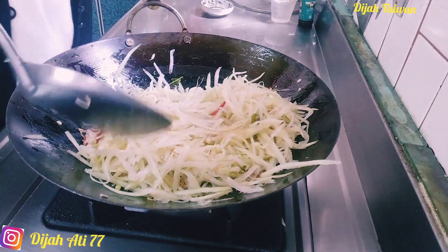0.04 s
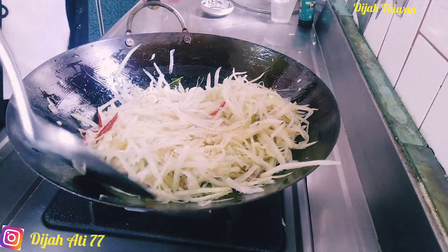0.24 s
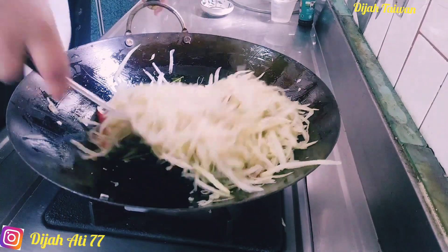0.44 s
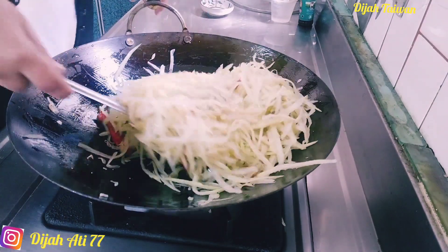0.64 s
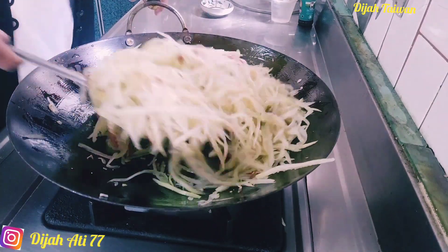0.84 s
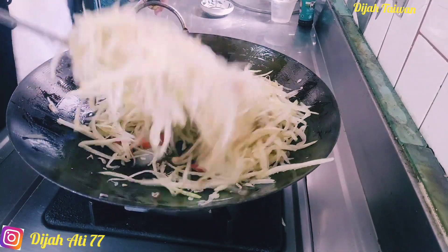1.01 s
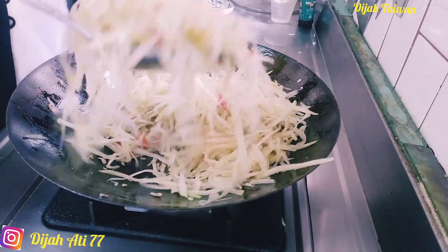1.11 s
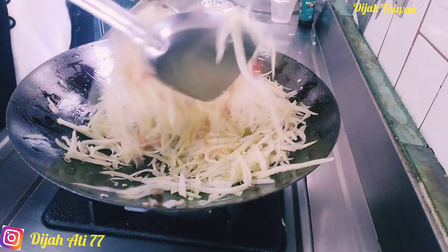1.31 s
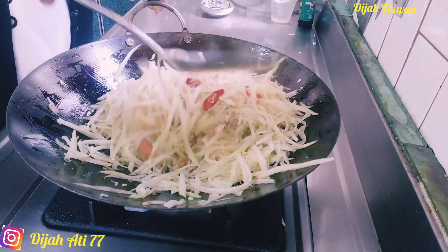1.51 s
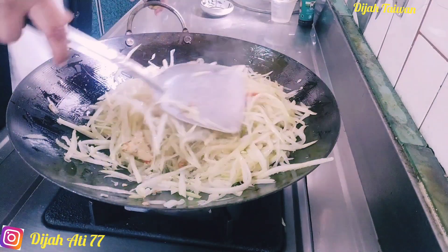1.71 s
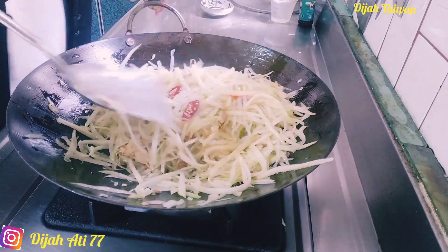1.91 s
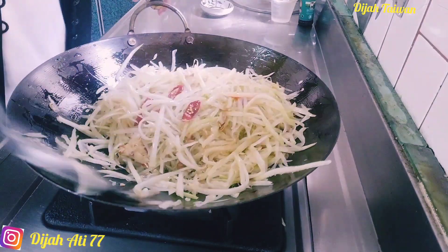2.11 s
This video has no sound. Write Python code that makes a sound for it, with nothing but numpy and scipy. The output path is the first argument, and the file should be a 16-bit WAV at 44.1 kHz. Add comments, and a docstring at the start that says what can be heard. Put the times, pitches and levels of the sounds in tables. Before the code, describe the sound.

Close, mono kitchen sound of stir-frying: moderate sizzle, a bright ringing spatula hit, quick heavy clanks with a rough scrape and wok knocks, a quieter lull, then crackling sizzle swelling twice as food lands on hot metal.

```python
"""Stir-frying in a steel wok

Shredded vegetable sizzles in oil, swelling whenever it is turned onto hot metal: random clicks, filtered.
A metal spatula clanks on the wok, chatters and scrapes under the heap: decaying modes and rough slips.
Oil spits in single short pops, and the wok rumbles on its stand over low burner and kitchen air."""
import sys
import numpy as np
from scipy import signal
from scipy.io import wavfile
from scipy.ndimage import uniform_filter1d

SR = 44100
rng = np.random.default_rng(int(sys.argv[2]) if len(sys.argv) > 2 else 0)


def transcribe(signal):
    """Save signal, clipped to [-1, 1], as a 16-bit WAV file at the path in sys.argv[1]."""
    frames = np.atleast_2d(signal).T
    limited = np.clip(frames, -1, 1)
    pcm = np.round(limited * 32767).astype(np.int16)
    wavfile.write(sys.argv[1], SR, pcm)


N = 94815
T = np.arange(N) / SR  # seconds

# Burner and kitchen air. Each row: frequency in Hz, relative density in dB per Hz.
AIR_SPECTRUM = [(15, -67), (25, -24), (54, -21), (91, -36), (118, -16), (176, -21.5), (283, -16.5),
                (508, -30), (592, -12.5), (700, -6.5), (910, -45), (1540, -120)]
AIR_DB = -63

# Knocking of the wok as it shifts on its stand. Each row: time in seconds, level in dB.
KNOCK_LEVEL = [(0.0, -31.5), (0.034, -41.5), (0.138, -57), (0.216, -62), (0.248, -39.5), (0.268, -39),
               (0.358, -54.5), (0.382, -37.5), (0.44, -43.5), (0.476, -60), (0.518, -43), (0.728, -80),
               (0.748, -78), (0.8, -78)]
# Spectrum of that knocking. Each row: frequency in Hz, relative density in dB per Hz.
KNOCK_SPECTRUM = [(24, -28), (40, -37), (166, -5.5), (334, -10.5), (595, -7.5), (869, -15), (1060, -14),
                  (1140, -28), (1500, -19), (1950, -82), (3300, -120)]
# Deepest part of the rocking. Each row: time in seconds, level in dB.
THUD_LEVEL = [(0.2, -70), (0.268, -72), (0.374, -52), (0.394, -57), (0.468, -55), (0.662, -54.5),
              (0.7, -69), (0.802, -62.5), (0.85, -81)]
THUD_HZ, THUD_WIDTH_HZ = 113.4, 78

# Spatula edge scraping the steel. Each row: time in seconds, level in dB.
SCRAPE_LEVEL = [(.34, -62), (.385, -53), (.40, -38.5), (.43, -35.5), (.47, -34), (.52, -36.5), (.56, -43),
                (.60, -64), (.64, -91)]
# Spectrum of the slips. Each row: frequency in Hz, relative density in dB per Hz.
SLIP_SPECTRUM = [(300, -11.5), (600, -10), (1050, -16), (1900, -10), (3000, -3), (4000, -1.5),
                 (5800, -11.5), (8000, -30), (12000, -24), (20000, -68)]
SLIPS_PER_S, SLIP_SPREAD_DB = 2000, 2.6
SCRAPE_RING_DB, SCRAPE_WIDTH_HZ = -3, 2.87 / 0.15  # ring against hiss; bandwidth of each damped mode

# Modes of wok and spatula. Each entry: frequency in Hz.
MODE_HZ = [178, 205, 258, 540, 592, 915, 1060, 1261, 1357, 1450, 1672, 1835, 1906, 2452, 2995, 3078, 3890,
           3940, 4085, 4570, 5090, 5485, 5770, 6130, 6900, 8100, 9900, 11800]
# The same modes in order. Each row: relative level in dB, free 60 dB decay time in seconds.
MODE_RINGING = [(-38, 0.24), (-16.5, 0.61), (-6, 0.29), (-29, .2), (-30, 0.23), (-11, 0.42), (2, 0.66),
                (-17.5, 1), (-18, 0.32), (-16, 0.081), (-7.5, 0.21), (-1, 0.062), (-7.5, .1), (-12.5, 0.13),
                (-6.5, 0.18), (-9, 0.21), (-9.5, 0.25), (-2.5, 0.14), (-16, 0.25), (-9, 0.11), (-18, 0.11),
                (-15, .1), (-15, 0.14), (-18, 0.11), (-7.5, 0.059), (-7, 0.048), (-15.5, 0.078), (-23, .06)]
# Blows, the first square on. Each row: start in seconds, level in dB, frequency rung best in Hz,
# share of the free decay time, rise time constant in seconds.
BLOWS = [(0.2391, -13.5, 1510, 0.81, 0.00085), (.355, -22, 2940, 0.68, 0.0063),
         (.376, -17.5, 203, 0.37, 0.0012), (0.375, -1.5, 1470, 0.52, .004),
         (0.391, -19, 3960, 0.65, 0.0046), (.405, -1.5, 560, 0.39, 0.0032), (.432, -1.5, 580, 0.56, 0.0024),
         (.443, -14.5, 3870, 0.46, 0.0043), (.459, -11, 1640, .5, 0.0071),
         (0.509, -34.5, 1060, 0.32, 0.0013), (.511, -16.5, 1370, 0.44, 0.00083),
         (.54, -17.5, 4085, .5, 0.0056), (1.158, -11.5, 4085, 0.39, 0.0054), (1.5, -30.5, 1060, 0.12, .004),
         (1.82, -14.5, 3160, 0.8, 0.0028), (1.854, -14.5, 4540, 0.96, 0.007),
         (1.878, -29.5, 1060, 0.17, 0.0038), (2.03, -35.5, 1060, 0.17, 0.0035)]
# Distance in octaves at which a mode is rung 6 dB less; dull blows are those aimed below DULL_BELOW_HZ.
SQUARE_OCT, GLANCING_OCT, DULL_OCT, DULL_BELOW_HZ = 4.0, 0.07, 0.3, 700
SLOW_RISE_S, SLOW_BELOW_HZ = 0.024, 1220  # after the square blow the low modes swell in slowly
PRESS_S, PRESS_DB_PER_S = 0.43, 80  # the spatula pressing under the food damps the blows' ringing

# Noise crack of the square blow. Each row: frequency in Hz, relative density in dB per Hz.
CRACK_SPECTRUM = [(500, -22), (1800, 0.5), (4000, -3.5), (8000, -7), (15700, -22)]
CRACK_DB, CRACK_RISE_S, CRACK_T60_S = -21, 0.00104, 0.08

# Loud single pops of oil. Each row: centre in seconds, envelope peak in dB, frequency in Hz.
SPITS = [(.819, -33, 4000), (.963, -30, 4000), (1.8198, -12, 2800), (1.9425, -22, 3000)]

# Course of the sizzle. Each row: time in seconds, level in dB, treble gain in dB, low-mid gain in dB.
SIZZLE = [(0, -38.5, -8, 8.5), (.11, -39.5, -10, -1), (.23, -39, -8.5, 4), (.36, -36, -10, 15.5),
          (.5, -38, -1, 8), (.6, -42, 0, 7), (.7, -41, 1, 2.5), (.86, -45, 0, -2), (.96, -44, 5, 8.5),
          (1.04, -37, 1.5, 6.5), (1.09, -31, -1.5, 2), (1.18, -30.5, 0.5, -3), (1.26, -33, -1, 0.5),
          (1.33, -36, 1, -2), (1.43, -36, 0, 1), (1.48, -31, -2, 8), (1.53, -35, 1.5, 5),
          (1.62, -34.5, -2.5, 4.5), (1.72, -38, 0.5, 3.5), (1.77, -34, -4, 11.5), (1.83, -30, -7, 7.5),
          (1.89, -30.5, -10, 0.5), (1.93, -33.5, -6.5, 7.5), (2.0, -35.5, -4, 5), (2.1, -38.5, -6, 6),
          (2.15, -37.5, -5.5, 4)]
# Spectrum of bursting bubbles. Each row: frequency in Hz, relative density in dB per Hz.
FRY_SPECTRUM = [(180, -73.5), (300, -28), (510, -25.5), (592, -15), (734, -14.5), (1040, -10), (1600, -9.5),
                (1760, -10.5), (2850, -5), (4040, -1.5), (4530, -5.5), (5910, -6.5), (10900, -17.5),
                (11800, -18), (15700, -19)]
# Bowl resonances under the food. Each row: frequency in Hz, bandwidth in Hz, relative level in dB.
BOWL_MODES = [(1040, 19, -5.5), (2414, 42, -0.5), (3330, 66, -5), (3606, 54, 4), (4085, 24, 6),
              (5840, 70, 2), (7050, 63, 0.5), (8895, 100, 0), (11660, 95, -5)]
POPS_PER_S, POP_SPREAD_DB = 8100, 1
BOWL_DB, RINGS_DB = -10, -8  # against the bubbles
RINGS_PER_S, RING_SPREAD_DB, RING_WIDTH_HZ = 2500, 2.2, 1.45 / 0.2  # bandwidth at 3 kHz
TREBLE_HZ, MIDS_FROM_HZ, MIDS_HZ = 7400, 740, 1700  # edges of the two moving bands
PATCH_DB, FLICKER_DB = 1, 0.8

EDGE_HZ = 15780  # upper band limit


def amp(db):
    """Decibel law: twenty decibels make a factor of ten in amplitude."""
    return 10 ** (np.asarray(db) / 20)


def evened(x):
    """Normalisation to unit root-mean-square."""
    return x / np.sqrt(np.mean(x ** 2) + 1e-20)


def curve(rows, col=1):
    """Linear interpolation of one column of a time table at every sample."""
    rows = np.array(rows)
    return np.interp(T, rows[:, 0], rows[:, col], right=rows[-1, col])


def colour(x, points):
    """Minimum-phase filtering: the Hilbert transform of log gain supplies a causal phase."""
    f, db = np.transpose(points)
    hz = np.abs(np.fft.fftfreq(8192, 1 / SR)) + 1
    # Two octaves below the first point the gain is 40 dB lower.
    gain_db = np.interp(np.log(hz), np.log(np.r_[f[0] / 4, f]), np.r_[db[0] - 40, db])
    log_gain = gain_db * np.log(10) / 20
    taps = np.fft.ifft(np.exp(log_gain - 1j * signal.hilbert(log_gain).imag)).real[:4096]
    return signal.oaconvolve(x, taps)[:len(x)]


def resonate(x, hz, width):
    """Damped resonance: one complex pole, about unit gain at its centre, bandwidth in Hz."""
    r = np.exp(-np.pi * width / SR)
    return 2 * signal.lfilter([1 - r], [1, -r * np.exp(2j * np.pi * hz / SR)], x).real


def clicks(per_s, spread_db):
    """Random impulse train: independent arrivals of either sign, a few of them large."""
    arrives = rng.random(N) < per_s / SR
    size = amp(spread_db * np.minimum(rng.exponential(1, N), 6))
    sign = rng.choice([-1., 1.], N)
    return evened(arrives * sign * size)


def room_air():
    """Steady broadband noise: filtered randomness as the low air of burner and kitchen."""
    noise = rng.standard_normal(N)
    return amp(AIR_DB) * evened(colour(noise, AIR_SPECTRUM + [(20000, -140)]))


def rumble():
    """Rocking contact: dull impulses of wok on stand, with a twice-resonated noise as deep thud."""
    knock = evened(colour(clicks(900, 1.7), KNOCK_SPECTRUM))
    knock = knock * amp(curve(KNOCK_LEVEL + [(.9, -110)]))
    deep = resonate(rng.standard_normal(N), THUD_HZ, THUD_WIDTH_HZ)
    deep = resonate(deep, THUD_HZ, THUD_WIDTH_HZ)
    return knock + evened(deep) * amp(curve([(.15, -90)] + THUD_LEVEL + [(.95, -70.5)]))


def scrape():
    """Rough sliding: the edge slips unevenly over the steel, hissing and ringing damped modes."""
    slips = colour(clicks(SLIPS_PER_S, SLIP_SPREAD_DB), SLIP_SPECTRUM)
    ring = sum(resonate(slips, hz, SCRAPE_WIDTH_HZ) for hz in MODE_HZ)
    return amp(curve(SCRAPE_LEVEL)) * (evened(slips) + amp(SCRAPE_RING_DB) * evened(ring))


def crack():
    """Impact noise: a brief coloured burst with exponential decay at the square blow."""
    t = np.maximum(T - BLOWS[0][0], 0)
    envelope = np.minimum(t / CRACK_RISE_S, 1) * amp(CRACK_DB - 60 * t / CRACK_T60_S)
    return evened(colour(rng.standard_normal(N), CRACK_SPECTRUM)) * envelope


def blows():
    """Modal excitation: each contact rings the modes near its best frequency, each decaying."""
    out = np.zeros(N)
    phases = rng.random((len(BLOWS), len(MODE_RINGING)))  # in cycles
    for (start, level_db, best_hz, free, rise_s), row in zip(BLOWS, phases):
        square = start == BLOWS[0][0]
        if square:
            spread = SQUARE_OCT
        else:
            spread = DULL_OCT if best_hz < DULL_BELOW_HZ else GLANCING_OCT
        t = np.maximum(T - start, 0)
        damped_db = PRESS_DB_PER_S * np.maximum(T - max(start, PRESS_S), 0)
        for hz, (mode_db, t60), phase in zip(MODE_HZ, MODE_RINGING, row):
            near_db = -6 * (np.log2(hz / best_hz) / spread) ** 2
            if near_db <= -50:
                continue
            slow_s = square * SLOW_RISE_S / (1 + (hz / SLOW_BELOW_HZ) ** 6)
            rise = 1 - np.exp(-t / (rise_s + slow_s))
            decay = amp(level_db + mode_db + near_db - damped_db - 60 * t / (t60 * free))
            out += decay * rise * np.sin(2 * np.pi * (hz * t + phase))
    return out


def spits():
    """Short wave packets: a Gaussian envelope leaves about one cycle of each loud oil pop."""
    out = np.zeros(N)
    for centre, db, hz in SPITS:
        cycles = (T - centre) * hz
        out += amp(db) * np.exp(-(cycles / 0.77) ** 2) * np.cos(2 * np.pi * cycles + 4.1)
    return out


def rings():
    """Impulse response: bursts on bare steel set off brief rings among many small modes."""
    pitches = np.geomspace(600, 14000, num=90) * rng.uniform(0.96, 1.02, 90)
    hits = clicks(RINGS_PER_S, RING_SPREAD_DB)
    which = rng.integers(0, len(pitches), N)  # the mode each hit excites
    out = np.zeros(N)
    for k, hz in enumerate(pitches):
        width = RING_WIDTH_HZ * np.sqrt(hz / 3000)
        out += np.sqrt(hz) * resonate(hits * (which == k), hz, width)
    return evened(colour(out, FRY_SPECTRUM))


def sizzle():
    """Dense shot noise: bursting bubbles, patchy in time and pitch, partly ringing the bowl."""
    pops = colour(clicks(POPS_PER_S, POP_SPREAD_DB), FRY_SPECTRUM)
    bowl = sum(amp(db) * evened(resonate(pops, hz, width)) for hz, width, db in BOWL_MODES)
    frying = evened(pops) + amp(BOWL_DB) * evened(bowl) + amp(RINGS_DB) * rings()

    hz, t, z = signal.stft(frying, SR, nperseg=512, noverlap=384)
    patch = uniform_filter1d(rng.standard_normal(z.shape), 8, 0)  # smoothed over frequency
    patch = evened(uniform_filter1d(patch, 20, 1))  # then over time
    flicker = evened(uniform_filter1d(rng.standard_normal(len(t)), 8))  # all frequencies together
    s, _, treble, mids = np.transpose(SIZZLE)
    high = 1 / (1 + (TREBLE_HZ / (hz + 1)) ** 4)
    low = 1 / (1 + (hz / MIDS_HZ) ** 4) / (1 + (MIDS_FROM_HZ / (hz + 1)) ** 6)
    db = high[:, None] * np.interp(t, s, treble) + low[:, None] * np.interp(t, s, mids)
    z = z * amp(db + PATCH_DB * patch + FLICKER_DB * flicker)
    x = signal.istft(z, SR, nperseg=512, noverlap=384)[1][:N]
    return x * amp(curve(SIZZLE))


def scene():
    """Superposition: all sources add, alike in both channels."""
    mix = room_air() + rumble() + scrape() + crack() + blows() + spits() + sizzle()
    return np.tile(mix, (2, 1))


def record(dry):
    """Band limitation: one microphone, a linear-phase low-pass on both channels."""
    taps = signal.firwin(1023, EDGE_HZ, window=("kaiser", 10), fs=SR)
    return signal.oaconvolve(dry, taps[None], "same")


dry = scene()
out = record(dry)
transcribe(out)
```